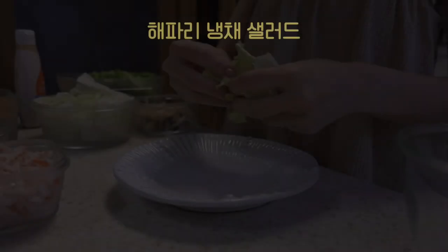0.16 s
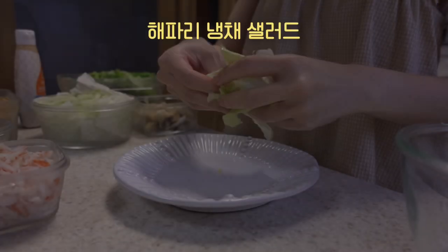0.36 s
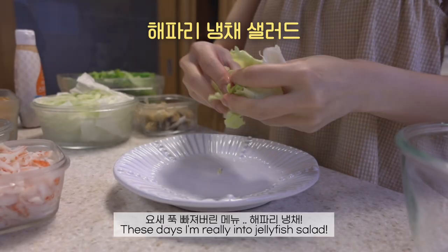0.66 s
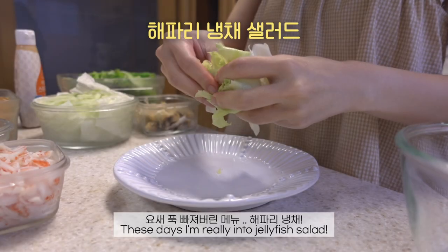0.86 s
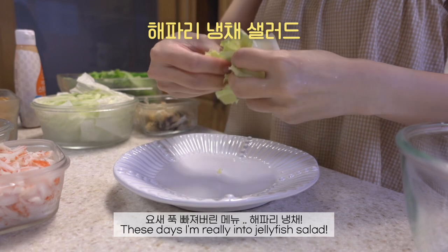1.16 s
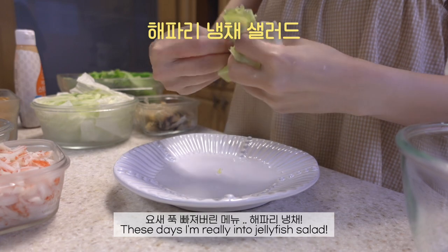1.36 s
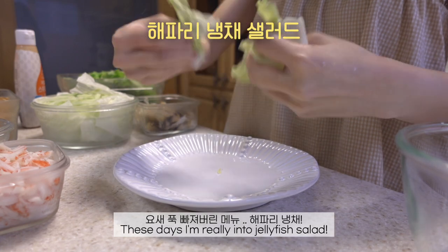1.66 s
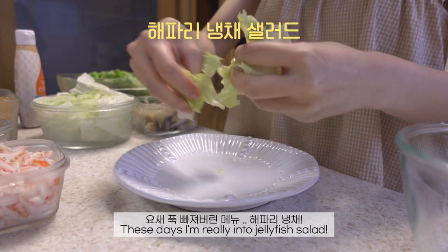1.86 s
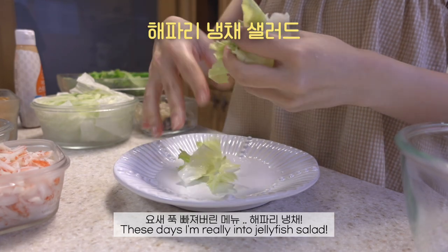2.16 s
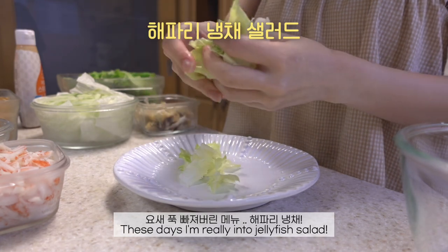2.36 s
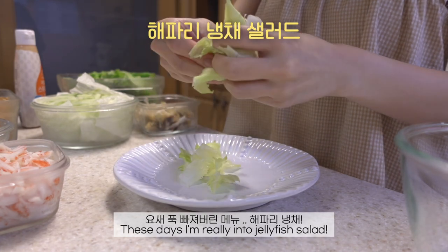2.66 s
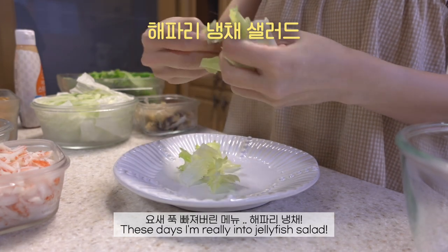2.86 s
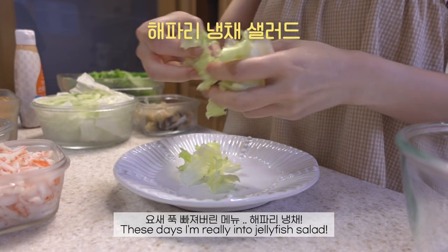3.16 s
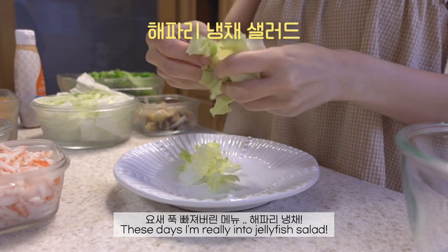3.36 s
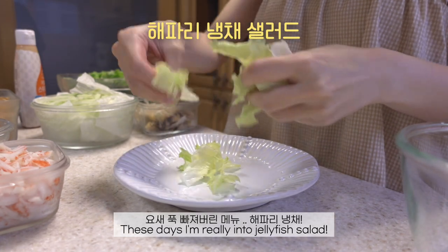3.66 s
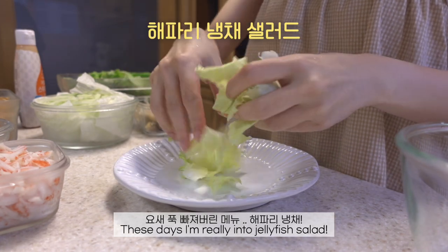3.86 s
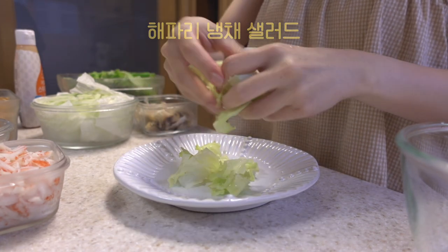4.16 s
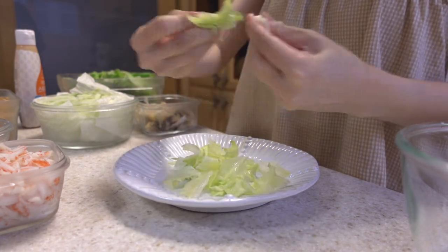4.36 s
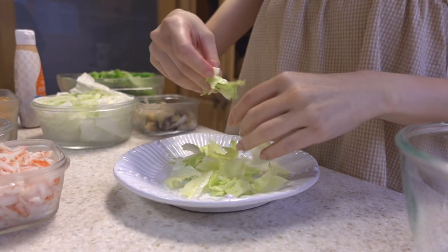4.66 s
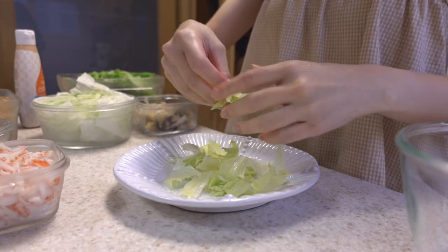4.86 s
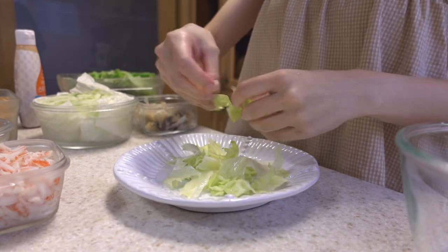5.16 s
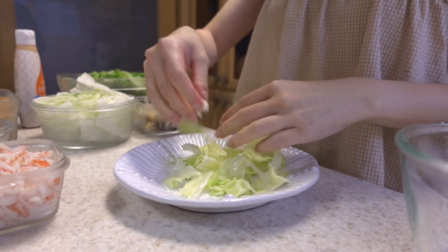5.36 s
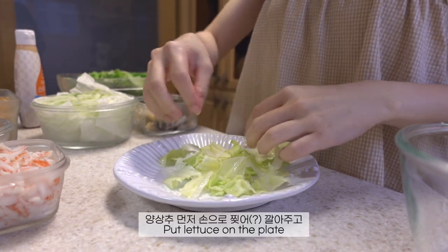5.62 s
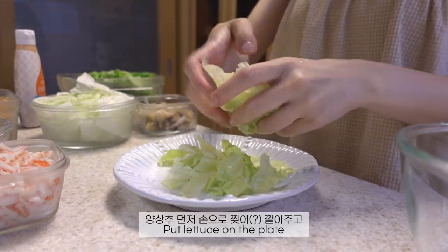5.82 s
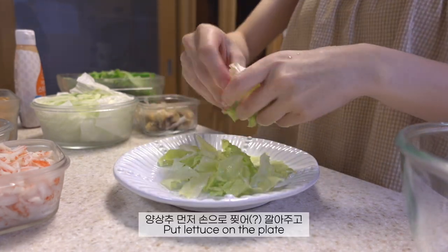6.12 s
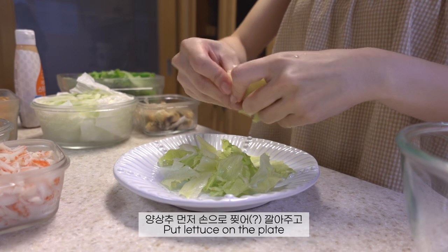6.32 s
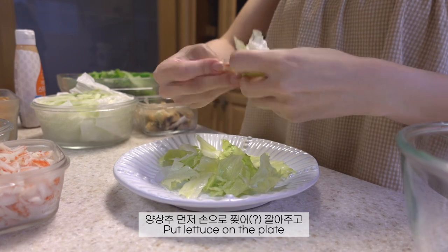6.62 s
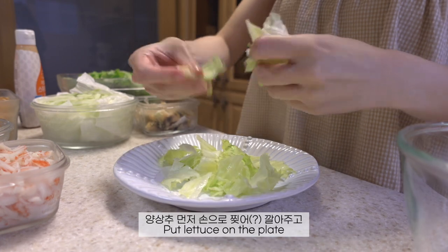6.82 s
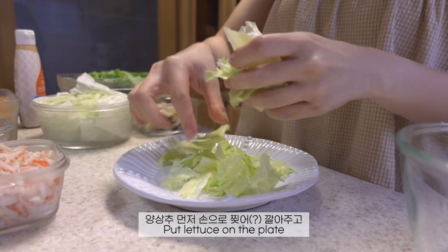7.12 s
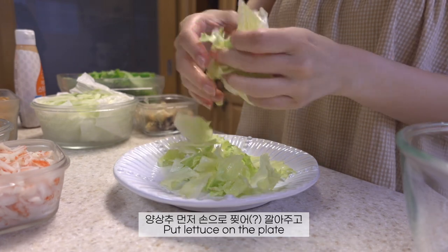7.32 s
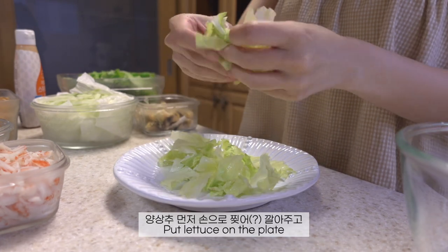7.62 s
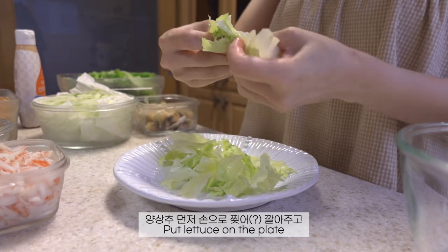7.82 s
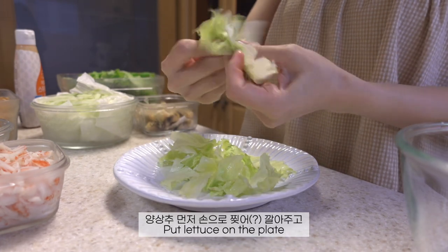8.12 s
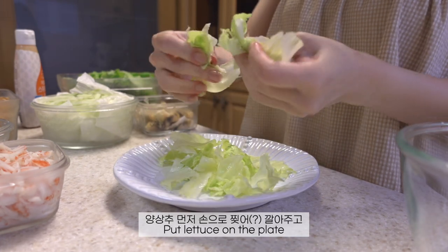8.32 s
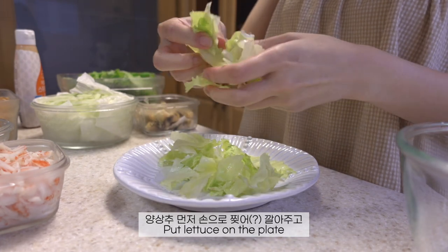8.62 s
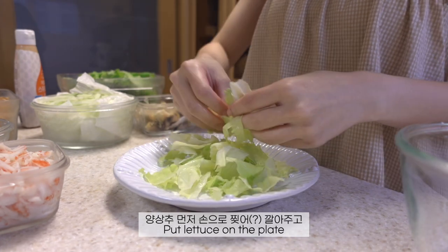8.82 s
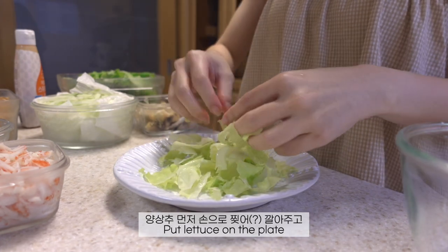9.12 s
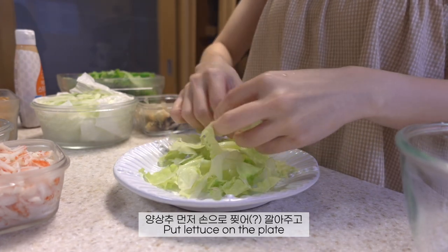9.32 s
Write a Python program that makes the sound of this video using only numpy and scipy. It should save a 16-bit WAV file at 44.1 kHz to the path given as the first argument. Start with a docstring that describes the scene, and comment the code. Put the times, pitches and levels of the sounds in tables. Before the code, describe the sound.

Close, dry crunches and crackles of lettuce being ripped apart, with quiet gaps, slight plate taps, and soft steady fridge hum behind.

```python
"""Crisp lettuce leaves are torn by hand over a ceramic plate, close by in a small kitchen.
Ribs snap as ragged noise bursts with a brief resonance; leaf cells crackle as clumps of tiny decaying sines.
Touches of the plate ring a few damped modes, and sparse reflections answer from the room.
Behind them a refrigerator hums as tones of wandering phase, over steady air of coloured noise."""
import sys
import numpy as np
from scipy import signal
from scipy.fft import rfft, irfft
from scipy.io import wavfile
from scipy.ndimage import uniform_filter1d

SR = 44100
rng = np.random.default_rng(int(sys.argv[2]) if len(sys.argv) > 2 else 0)


def put_to_file(sound):
    """Save the sound as 16-bit audio at rate SR, in the file named by the first command-line argument."""
    columns = np.atleast_2d(sound).T  # one column per channel
    safe = np.clip(columns, -1, 1)
    whole_steps = np.round(safe * 32767)
    wavfile.write(sys.argv[1], SR, whole_steps.astype(np.int16))


N = 418156  # length in samples


def gain_of(db):
    """Decibel law: every 20 dB is a factor of ten in amplitude."""
    return 10 ** (np.asarray(db) / 20)


def evened(x):
    """Normalisation: scales x to an RMS of one."""
    return x / np.sqrt(np.mean(x ** 2) + 1e-20)


def read(points, hz):
    """Logarithmic frequency scale: interpolates (Hz, value) points at hz."""
    point_hz, value = np.transpose(points)
    return np.interp(np.log(hz + 1), np.log(point_hz + 1), value)


def add(mix, start_s, sound):
    """Superposition: adds a sound to the mix, cut at the mix's end."""
    part = mix[round(start_s * SR):][:len(sound)]
    part += sound[:len(part)]


def colour(x, db):
    """Linear filtering: shapes the spectrum of x by db(hz)."""
    hz = np.fft.rfftfreq(len(x), 1 / SR)
    return irfft(rfft(x) * gain_of(db(hz)), len(x))


def thirds(x):
    """Band splitting: low body, middle and treble that sum to x again."""
    body_hz, treble_hz = 1600, 8000
    hz = np.fft.rfftfreq(len(x), 1 / SR)
    low = 1 / (1 + (hz / body_hz) ** 12)
    high = 1 / (1 + (treble_hz / (hz + 1)) ** 6)
    return [irfft(rfft(x) * part, len(x)) for part in (low, 1 - low - high, high)]


# Spectrum of the room's air. Each row: frequency in Hz, relative density in dB per Hz.
AIR_SPECTRUM = [(40, -40), (60, -15), (92, -18.5), (123, -1.5), (190, -5), (235, -4.5), (344, -6.5),
                (531, -12), (800, -15), (1400, -15), (2000, -13), (2690, -13), (3100, -18), (5140, -21.5),
                (10400, -36.5), (16000, -43)]
# Likeness of the two sides. Each row: frequency in Hz, left-right correlation from 0 to 1.
SIDE_LIKENESS = [(60, 1), (240, 0.78), (950, 0.69), (3770, 0.77), (15000, 0.59)]


def air(level_db=-54):
    """Diffuse field: steady noise, partly correlated between the sides, with faint drifting patches."""
    frames, hz = N // 512 + 5, np.fft.rfftfreq(2048, 1 / SR)
    a, b, c, d, patches = rng.standard_normal((frames, 1025, 5)).T
    # smoothed over 20 frequency bins and 8 frames
    patches = evened(uniform_filter1d(uniform_filter1d(patches, 20, 0), 8, 1))
    same = np.clip(read(SIDE_LIKENESS, hz), -1, 1)[:, None]
    left = a + 1j * b
    right = same * left + np.sqrt(1 - same ** 2) * (c + 1j * d)
    spectrum = np.array([left, right]) * gain_of(read(AIR_SPECTRUM, hz)[:, None] + 1.2 * patches)
    noise = signal.istft(spectrum, nperseg=2048, noverlap=1536)[1][:, :N]
    return gain_of(level_db) * evened(noise)


# Compressor tones. Each row: frequency in Hz, RMS level in dB before the left-right tilt, line width in Hz.
HUM_TONES = [(120, -57, 0.38), (57.3, -80, 2.4), (166.6, -66.5, 3.22), (215.3, -73, 7.4),
             (238, -69.5, 4.88), (276, -78.5, 4.1), (340.7, -69.5, 8.1), (378.7, -70.5, 4.74)]


def hum():
    """Phase diffusion: compressor tones whose phase wanders, which widens each spectral line."""
    t = np.arange(N) / SR
    walks = np.cumsum(rng.standard_normal((len(HUM_TONES), N)), axis=1)
    out = np.zeros(N)
    for (hz, db, width_hz), walk in zip(HUM_TONES, walks):
        wander = np.sqrt(2 * np.pi * width_hz / SR) * uniform_filter1d(walk, 2000)
        out += np.sqrt(2) * gain_of(db) * np.sin(2 * np.pi * hz * t + wander)
    return out


# Reverberation of the kitchen. Each row: frequency in Hz, time to die by 60 dB in seconds.
ROOM_DECAY = [(700, 0.31), (2600, 0.2), (7000, 0.2), (14000, 0.14)]


def kitchen(x, alike=0.96, turn_hz=11.):
    """Reverberation: sparse reflections of random sign, each band dying at its own speed.
    Three tails trade shares of x in a steady cycle, so successive snaps meet different reflections."""
    out = np.zeros((2, N))
    for place in range(3):
        taps = np.zeros((2, SR // 2))
        at = np.arange(100, SR // 2 - 20, 12)
        at = at + rng.integers(0, 12, (2, len(at)))
        np.put_along_axis(taps, at, rng.choice([-1., 1.], at.shape), 1)
        hz, t, z = signal.stft(taps, SR, nperseg=256)
        decay = gain_of(-60 * t / read(ROOM_DECAY, hz)[:, None])
        both, side = signal.istft(z * decay, SR, nperseg=256)[1]
        # the reverberation starts a little softer and builds up over some tens of milliseconds
        grows = 1 - 0.21 * np.exp(-np.arange(len(both)) / SR / 0.046)
        both, side = both * grows, side * grows ** 2
        tail = alike * both + np.sqrt(1 - alike ** 2) * np.outer([1, -1], side)
        # the squared shares of the three places add up to one
        share = np.sqrt(2 / 3) * np.cos(np.pi * (turn_hz * np.arange(N) / SR + place / 3))
        out += signal.fftconvolve((x * share)[None], tail / np.linalg.norm(both), axes=1)[:, :N]
    return out


# Touches of the plate. Each row: start in seconds, nominal level in dB, place from 0 to 2 along the rim.
PLATE_TOUCHES = [(1.966, -48, 0), (2.027, -45, 0.32), (4.694, -39, 0.39), (5.495, -43, 1.2),
                 (5.572, -40, 1.75)]
# Modes of the plate. Each row: frequency in Hz, level in dB at places 0, 1 and 2,
# time to die by 60 dB in seconds.
PLATE_MODES = [(1860, -25, -25, -5, 0.068), (2450, -2, -11, -16, 0.12), (2950, -40, -1, -0.5, 0.15),
               (3820, -11, -1, -12, 0.045), (4210, -22, -12, -6, .09), (5530, -19, -8, -20, 0.074),
               (8900, -40, -40, -22, .1)]


def plate():
    """Modal excitation: a fingernail or rib taps the rim with a scuff; the place sets how each mode rings."""
    out, t = np.zeros(N), np.arange(8000) / SR
    noises = rng.standard_normal((len(PLATE_TOUCHES), 8000))
    for (start_s, level_db, place), noise in zip(PLATE_TOUCHES, noises):
        ring = np.zeros(len(t))
        for hz, *place_db, t60 in PLATE_MODES:
            mode_db = np.interp(place, [0, 1, 2], place_db)
            ring += gain_of(mode_db - 60 * t / t60) * np.sin(2 * np.pi * hz * t)
        scuff = 0.17 * np.diff(noise, prepend=0) * np.exp(-t / 0.0022)
        onset = 1 - np.exp(-t / 0.00092)
        add(out, start_s, gain_of(level_db) * (ring + scuff) * onset)
    return out


# Spectrum of the leaf. Each row: frequency in Hz, relative density in dB per Hz.
LEAF_SPECTRUM = [(200, -17), (600, -26.5), (1000, -15), (1700, -10), (2200, -3), (3900, -3), (5300, -4),
                 (8000, -5), (11000, -11), (14000, -16), (16000, -21.5)]


def leaf_db(hz):
    """Radiation spectrum: how strongly the leaf sounds at each frequency."""
    return read(LEAF_SPECTRUM, hz)


# Hands working the leaves. Each row: time in seconds, nominal crackle level in dB,
# treble in dB relative to that level.
HAND_LEVELS = [(.03, -49, -11), (.13, -43, -12), (.4, -42.5, -14), (.54, -46, -6), (.63, -57, -16),
               (.66, -40.5, -12), (.75, -39.5, -12), (.84, -44.5, -12), (.95, -42, -9), (1.13, -46.5, -8),
               (1.4, -50, -6), (1.5, -54, -3.5), (1.9, -62, -8), (2.24, -59.5, -18), (2.28, -55.5, -17),
               (2.45, -46.5, -14), (2.75, -46.5, -0.5), (3.02, -63.5, -3), (3.08, -48, -6),
               (3.2, -56.5, -13), (3.5, -48, -1), (3.63, -58.5, -5), (3.7, -50.5, -4), (3.8, -59, -10),
               (4.15, -63.5, -18), (4.3, -48, -8), (4.45, -62, -4), (4.62, -64, -8), (4.67, -58, -9),
               (4.76, -67, -11), (5.03, -69, -9), (5.11, -61, 2), (5.19, -72, -6), (5.44, -69, -14),
               (5.49, -58, -11), (5.54, -68, -14), (5.76, -72, -18), (5.8, -50, -11), (5.94, -55, -16),
               (6.1, -44, -21), (6.27, -53, -16), (6.5, -39.5, -10), (6.62, -41.5, -6), (6.8, -51, -9),
               (7.05, -57.5, -24), (7.42, -58.5, -22), (7.455, -49, -14), (7.56, -54.5, -11),
               (7.7, -49, -4), (7.9, -51.5, 4), (8.11, -55, -1), (8.136, -30, -8), (8.17, -48, -4),
               (8.28, -51.5, -10), (8.45, -54.5, -5), (8.72, -58.5, -12), (9.15, -70, -22),
               (9.48, -68, -20)]


def handling(t):
    """Drive level: interpolates the hands' crackle and treble levels in dB at times t."""
    s, level_db, treble_db = np.transpose(HAND_LEVELS)
    return np.interp(t, s, level_db), np.interp(t, s, treble_db)


def trail(level_db=-30.5, dying_s=0.03):
    """Exponential relaxation: torn cells go on crackling after each clear snap, their powers adding up."""
    power = np.zeros(N)
    for s, peak_db, *_ in CLEAR_SNAPS:
        power[round(s * SR)] = gain_of(peak_db + level_db) ** 2
    return np.sqrt(signal.lfilter([1], [1, -np.exp(-2 / (dying_s * SR))], power))


def crackle(per_s=4000., spread_db=3., trail_treble_db=3.5):
    """Random impulse process: leaf cells burst in clumps, each ringing briefly at its own pitch."""
    t = np.arange(N) / SR
    drift = uniform_filter1d(uniform_filter1d(rng.standard_normal(N), 150), 150)
    clumps = gain_of(3.9 * evened(drift))
    strength = gain_of(spread_db * np.minimum(rng.exponential(1, N), 3.5))
    bursts = strength * (rng.random(N) < per_s / SR) * clumps
    kind, cells, u = rng.integers(0, 24, N), np.zeros(N), np.arange(200) / SR
    cycles = rng.uniform(0.18, 3.4, 24)  # decay time of each kind, in cycles
    for k, hz in enumerate(np.geomspace(1200, 15000, num=24)):
        cell = np.sin(2 * np.pi * hz * u) * np.exp(-u * hz / cycles[k])
        cell = cell * np.sqrt(hz) / np.linalg.norm(cell)
        cells += signal.oaconvolve(bursts * (kind == k), cell)[:N]
    low, middle, treble = thirds(colour(cells, leaf_db))
    level_db, treble_db = handling(t)
    level, after = gain_of(level_db), trail()
    bright = np.hypot(level * gain_of(treble_db), after * gain_of(trail_treble_db))
    return (low + middle) / np.std(middle) * np.hypot(level, after) + evened(treble) * bright


def snap(peak_db, ring_hz, low_db, treble_db, rise_ms, fall_ms, noise, ring_db=7.5, skirt_db=1.5):
    """Damped resonance: a quick run of fibres breaks raggedly and rings briefly in the leaf that holds it."""
    ms = np.arange(len(noise)) / SR * 1000 - LEAD_MS
    lasts = np.array([[1.5], [1.1], [.9]])  # the treble dies first
    scale_ms = np.where(ms < 0, rise_ms, fall_ms * lasts)
    t = abs(ms) / np.clip(scale_ms, [[.9], [.1], [.1]], 9)  # the low body cannot move quickly
    shape = np.exp(-t ** 0.75) + (ms > 0) * 0.17 * t * np.exp(-t / 1.38)

    def spectrum_db(hz):
        """Resonance curve: a peak at the ring; a small patch moves little below its pitch."""
        ring = ring_db / (1 + (3 * (hz / ring_hz - 1)) ** 2)
        octaves_below = np.clip(np.log2(ring_hz / (hz + 1)), 0, 1.5)
        return leaf_db(hz) + ring - skirt_db * octaves_below

    parts = thirds(colour(noise, spectrum_db)) * shape
    burst = gain_of([low_db, 0, treble_db]) / np.linalg.norm(parts, axis=1) @ parts
    strongest = uniform_filter1d(burst ** 2, 44).max()  # mean square over 1 ms
    return gain_of(peak_db) * burst / np.sqrt(2 * strongest)


def small_snaps(count=1200, per_s=70., over_crackle_db=5.5, spread_db=4):
    """Poisson process: rows of chance snaps, their strength and brightness following the handling."""
    wait, size, pitch, low, tone, rise, fall = rng.random((count, 7)).T
    at = .04 - np.cumsum(np.log(1 - wait)) / per_s
    level_db, treble_db = handling(at)
    peak_db = level_db + over_crackle_db - spread_db * np.maximum(np.log(1 - size), -2.5)
    ring_hz, low_db = 2400 * 3.3 ** pitch, -28 + 11 * low
    treble_db = treble_db - 11 + 11 * tone
    rise_ms, fall_ms = 0.18 + 1.3 * rise ** 2, 0.22 + 2.0 * fall
    rows = np.transpose([at, peak_db, ring_hz, low_db, treble_db, rise_ms, fall_ms])
    return rows[at < N / SR - .03]


LEAD_MS = 9.  # room before each snap's peak for its build-up
# The clearest snaps of ribs and tears. Each row: time of the peak in seconds, nominal peak level in dB,
# ring in Hz, low body and treble in dB relative to the middle band,
# nominal build-up and dying times in milliseconds.
CLEAR_SNAPS = [(0.0718, -44, 4090, -29, -20, 0.2, 0.3), (0.0781, -29, 5490, -25, -19, 0.3, 0.91),
               (0.11, -29.5, 2580, -18, -10, 0.6, 3.8), (0.1244, -30, 2630, -34, -9, 0.2, 0.3),
               (0.1675, -23, 6400, -26, 6, 0.2, 0.27), (0.1824, -22.5, 3290, -23, -7, 0.2, 1.9),
               (0.2079, -24.5, 2690, -26, -13, 0.7, 0.9), (0.226, -14.5, 2900, -28, -8, 0.36, 0.55),
               (0.2358, -22, 5470, -29, -14, 0.3, 0.93), (0.2578, -33, 3230, -13, -14, 0.3, 1.2),
               (0.3138, -30, 2670, -17, -13, 0.3, 1.4), (0.3221, -25, 4160, -16, -4, 0.3, 0.7),
               (0.3734, -19, 5100, -16, -7, 0.3, 1.0), (0.383, -22.5, 4220, -16, -16, 0.2, 2.1),
               (0.3959, -24.5, 3010, -14, -11, 1, 5.6), (0.4234, -21.5, 3360, -16, -4, 0.34, 2.0),
               (0.4893, -13.5, 4230, -20, -9, 0.22, 1.1), (0.5232, -22.5, 3450, -15, -10, 4.1, 2.7),
               (0.5439, -25.5, 3420, -14, -13, 4.1, 0.6), (0.6471, -25.5, 3230, -18, -19, 0.3, 0.97),
               (0.6677, -27, 2990, -10, -15, 2.2, 0.5), (0.6752, -22, 4030, -20, -14, 3.4, 1.2),
               (0.6886, -24, 3140, -17, -10, 0.3, 1.2), (0.7039, -13, 3460, -29, -16, 0.76, 1),
               (0.7226, -26, 2650, -16, -11, 4.1, 1.9), (0.7386, -12, 3870, -33, -25, 0.22, 0.33),
               (0.7916, -18, 3380, -19, -10, 0.2, 0.3), (0.7985, -13, 9190, -31, -5, 0.3, 1.1),
               (0.863, -26.5, 4220, -18, -19, 0.75, 1.5), (0.902, -19, 2580, -20, -9, 0.3, 1.5),
               (0.91, -23, 3120, -21, -11, 1.3, 0.7), (0.9396, -10.5, 3820, -28, -11, 0.35, 0.27),
               (0.9458, -13, 5070, -17, -7, 2.1, 1), (0.952, -22, 3400, -12, -7, 0.3, 2.2),
               (0.974, -12.5, 4050, -19, -16, 1.2, 0.97), (0.9932, -13, 4160, -27, -5, 0.96, 1.2),
               (1.0135, -13.5, 6780, -35, 5, 0.3, 0.3), (1.021, -10.5, 4000, -24, -14, 0.8, 0.62),
               (1.069, -22, 3170, -29, -9, 0.3, 0.8), (1.117, -11.5, 3400, -25, -17, 0.98, 0.59),
               (1.1315, -21, 2730, -22, -17, 0.6, 3.4), (1.1507, -17, 2000, -22, -11, 0.7, 1.7),
               (1.1963, -24, 6140, -25, -1, 0.2, 0.3), (1.212, -17.5, 3520, -34, -11, 0.44, 0.4),
               (1.2515, -30, 11280, -34, 2, 0.2, 0.6), (1.2665, -10.5, 3450, -23, -7.5, 0.4, 1.8),
               (1.3177, -20.5, 2630, -17, -10, 1.0, 1.0), (1.3343, -20.5, 3230, -19, -7, 0.3, 3.8),
               (1.3594, -16.5, 8120, -32, -8, 0.2, 0.35), (1.3662, -22, 5750, -23, -6, 0.2, 0.3),
               (1.4132, -28, 4440, -36, -1, 0.3, 0.98), (1.4383, -21.5, 7860, -26, -2, 0.22, 0.3),
               (1.5158, -32, 8140, -27, -2, 0.2, 0.3), (1.5217, -29, 8010, -38, -2, 0.3, 0.6),
               (1.528, -23, 7860, -29, 6, 0.2, 0.48), (1.5374, -7.5, 4650, -18.5, -7.5, 0.68, 1.54),
               (1.5455, -19.5, 4350, -22, -5, 4.1, 4.2), (1.5893, -26, 4540, -26, -1, 0.3, 1.24),
               (1.6051, -22.5, 4480, -24, -3, 0.2, 0.3), (1.9565, -40, 6200, -22, -11, 0.2, 2.2),
               (1.9672, -36.5, 2410, -30, -7, 1.6, 1.3), (2.0284, -34.5, 2370, -12, -16, 0.6, 1.5),
               (2.2667, -25.5, 4400, -31, -8, 0.5, 1.1), (2.287, -26.5, 2520, -20, -9, 0.3, 2.4),
               (2.36, -25.5, 3850, -18, -8, 0.3, 0.58), (2.4019, -25, 3700, -35, 1, 0.2, 1.1),
               (2.4849, -31.5, 3810, -19, -9, 2.2, 3.6), (2.5125, -26, 5020, -28, -12, 0.2, 0.28),
               (2.534, -25, 5120, -26, -11, 0.2, 0.91), (2.5479, -24.5, 3190, -23, -21, 0.2, 0.9),
               (2.5993, -12.5, 5860, -25, -6, 0.32, 0.78), (2.6291, -19, 3850, -31, -6, 0.3, 0.74),
               (2.6415, -19, 6680, -34, 0, 4.1, 1.0), (2.6537, -10, 4900, -35, -11, 0.45, 0.71),
               (2.6885, -14, 7110, -41, 2, 0.22, 0.46), (2.7008, -24, 2630, -30, -12, 4.1, 1.6),
               (2.723, -27, 6650, -23, -5, 0.3, 0.3), (2.7562, -20, 5580, -24, -6, 0.3, 2.2),
               (2.7724, -22.5, 8700, -27, -4, 0.3, 1.4), (2.779, -21.5, 8870, -27, -3, 0.91, 0.3),
               (2.7915, -20, 4890, -26, -7, 0.3, 1.7), (2.7982, -21, 7690, -36, -3, 0.2, 0.33),
               (2.8133, -11, 8540, -23, -10.5, 1.2, 3.1), (2.8871, -22.5, 6120, -18, -10, 0.2, 0.4),
               (2.895, -23.5, 7430, -18, -6, 0.7, 0.84), (2.9767, -38, 4760, -24, -8, 0.2, 0.3),
               (3.065, -33, 2410, -25, -11, 0.2, 0.4), (3.079, -33, 2730, -22, -10, 5.1, 3.3),
               (3.0883, -30.5, 2600, -25, -10, 1.6, 1.6), (3.0961, -29, 7080, -33, -4, 0.3, 0.3),
               (3.2695, -22, 6610, -24, -12, 0.24, 0.38), (3.3246, -28, 5190, -22, -3, 0.3, 0.52),
               (3.3297, -17.5, 6300, -32, -2, 0.37, 0.85), (3.3631, -19.5, 3270, -23, -6, 0.4, 2.6),
               (3.4012, -33, 6180, -27, -9, 0.3, 0.8), (3.428, -31, 6030, -30, 2, 0.3, 0.6),
               (3.4962, -17, 6140, -25, -2, 0.23, 0.64), (3.5046, -19, 6980, -26, -2, 3.2, 2),
               (3.5109, -21, 7470, -36, -7, 0.3, 0.79), (3.5243, -19.5, 7860, -16, -2, 0.3, 0.71),
               (3.6646, -28, 6700, -30, -6, 0.33, 0.38), (3.6835, -28.5, 2090, -22, -14, 1.1, 0.35),
               (3.7059, -28.5, 5210, -20, -12, 1.4, 0.3), (3.8488, -39, 2380, -24, -24, 0.2, 0.9),
               (4.1812, -35, 2520, -27, -18, 1, 2), (4.2462, -20, 4770, -39, -8, 0.2, 1.0),
               (4.322, -22, 8600, -18.5, -4.5, 0.7, 1.2), (4.3337, -26, 5300, -21, -6, 0.7, 1.5),
               (4.347, -22, 10000, -16, 3, 2.2, 2.6), (4.5093, -37, 4720, -29, -14, 0.3, 2.2),
               (4.5293, -42, 5530, -23, -10, 1.8, 2.9), (4.682, -39.5, 1920, -23, -16, 0.2, 1.3),
               (4.6883, -38, 3250, -12, -20, 0.2, 1.9), (5.0931, -42, 5580, -23, -10, 0.6, 2.5),
               (5.788, -33, 2760, -29, -18, 2.3, 2.1), (5.813, -29, 3140, -16, -18, 2.1, 1.2),
               (5.8185, -26, 3320, -16, -22, 0.2, 1.4), (5.8317, -32, 5190, -15, -14, 1.2, 2),
               (5.8438, -26.5, 3170, -24, -6, 0.48, 0.5), (5.865, -34.5, 2760, -16, -15, 3.9, 0.4),
               (5.9025, -35, 3290, -18, -23, 1.2, 0.6), (5.9836, -19.5, 4700, -22, -17, 0.47, 1.4),
               (6.0032, -17, 3850, -17.5, -14, 2.1, 0.6), (6.0886, -23.5, 2760, -20, -12, 1.2, 0.9),
               (6.101, -17, 2700, -17, -14, 0.2, 1.5), (6.1135, -30.5, 3170, -11, -11, 0.6, 1.8),
               (6.1989, -23, 3170, -19, -23, 0.2, 2.0), (6.24, -25, 7020, -34, -5, 0.2, 1.1),
               (6.246, -21.5, 2710, -28, -16, 0.2, 1.7), (6.259, -23, 2760, -22, -14, 0.3, 1.1),
               (6.294, -14.5, 3230, -27, -19, 0.4, 1.1), (6.3264, -22, 2780, -30, -17, 0.2, 1.0),
               (6.3367, -26, 2730, -25, -23, 0.23, 0.9), (6.3595, -10.5, 3940, -25, -4, 0.16, 0.77),
               (6.384, -18, 3230, -20, -14, 0.2, 0.4), (6.3945, -9, 3080, -17, -14, 0.34, 1.4),
               (6.401, -12.5, 3960, -17, -14, 0.9, 1.9), (6.4219, -16, 4840, -24, -9, 0.3, 1.2),
               (6.4355, -16, 3850, -18, -6, 0.3, 2.3), (6.4441, -13, 9690, -25, -4, 0.8, 1.4),
               (6.4628, -16, 7600, -15, -7, 1.9, 0.5), (6.475, -11, 2220, -28, -15, 0.2, 0.79),
               (6.491, -8.5, 4700, -27, -13, 0.2, 0.6), (6.519, -17, 3190, -16, -9, 0.4, 3.6),
               (6.5268, -10, 3850, -17.5, -7, 2.8, 1.6), (6.5387, -15.5, 6030, -18, -12, 0.6, 2.8),
               (6.5444, -19, 2860, -14, -13, 0.2, 1.5), (6.5633, -10, 2950, -31, -21, 0.25, 0.92),
               (6.6017, -21, 3920, -22, -10, 1.6, 1.8), (6.6171, -19, 4650, -27, -13, 1.8, 1.0),
               (6.6408, -10.5, 3630, -16, -11, 1.3, 0.55), (6.674, -10, 3370, -17, -7.5, 0.7, 2.1),
               (6.688, -22, 3570, -18, -11, 4.1, 3.1), (6.71, -19.5, 3940, -22, -11, 0.2, 0.74),
               (6.814, -31, 2780, -14, -19, 0.9, 0.3), (6.8597, -32.5, 2800, -21, -15, 0.6, 0.7),
               (6.882, -34, 4160, -20, -11, 0.3, 0.81), (6.901, -34, 4220, -17, -16, 0.3, 0.4),
               (6.912, -28.5, 2730, -30, -26, 0.34, 0.78), (6.9259, -37, 2450, -30, -18, 0.2, 1.2),
               (6.9614, -34.5, 3140, -29, -14, 0.2, 0.8), (7.0085, -33, 3080, -24, -25, 0.44, 0.8),
               (7.0444, -30.5, 3250, -34, -18, 0.3, 0.96), (7.0543, -29, 4180, -25, -20, 0.3, 1.2),
               (7.069, -35, 4610, -24, -18, 0.3, 1.8), (7.0743, -33, 4240, -26, -15, 0.88, 0.3),
               (7.0897, -35, 4940, -31, -20, 0.3, 2.7), (7.191, -41, 3270, -16, -21, 0.3, 1.0),
               (7.2485, -40, 4260, -26, -21, 0.2, 0.8), (7.3146, -39, 3380, -26, -12, 0.2, 0.5),
               (7.357, -40.5, 3880, -18, -18, 3.5, 1.4), (7.4632, -24.5, 3300, -33, -21, 0.46, 0.62),
               (7.5005, -28.5, 3850, -30, -13, 3.4, 0.4), (7.5133, -23, 3940, -35, -9, 0.24, 0.3),
               (7.5939, -19.5, 3150, -27, -17, 0.2, 0.9), (7.655, -25, 4780, -23, -10, 0.2, 1.3),
               (7.7088, -19.5, 6480, -25, -11, 0.18, 0.34), (7.7232, -20.5, 6240, -31, -8, 0.26, 0.9),
               (7.7401, -13, 6440, -38, -3, 0.2, 1.6), (7.802, -30, 6680, -34, -3, 0.2, 1.5),
               (7.828, -27.5, 9500, -27, 0, 1.6, 0.8), (7.8442, -25, 7470, -27, -7, 0.3, 1.0),
               (7.8501, -15.5, 3400, -31, -16, 0.23, 0.48), (7.8575, -24, 5600, -22, -10, 0.2, 0.5),
               (7.8644, -21, 5580, -22, -5, 0.3, 1.0), (7.8725, -24.5, 4290, -20, -4, 2.2, 1.4),
               (7.9063, -19, 2730, -17, -2, 0.17, 0.62), (7.913, -14, 5500, -17, -18, 0.27, 1.2),
               (7.9201, -27, 4310, -19, -15, 0.4, 0.75), (7.9678, -26, 7580, -21, -11, 0.3, 0.9),
               (7.9928, -25.5, 4330, -36, 0, 0.2, 0.8), (8.0131, -21, 5030, -31, -12, 0.14, 0.25),
               (8.1184, -23, 5120, -35, -2, 0.33, 0.3), (8.13, -6.5, 7400, -16.5, -7, 0.22, 0.57),
               (8.143, -7.5, 4840, -26, -6, 0.8, 1.0), (8.149, -15, 6800, -26, -3, 1.6, 2.7),
               (8.1835, -20, 7640, -23, -7, 0.5, 2.4), (8.1899, -10, 6680, -21.5, -8, 0.33, 0.46),
               (8.1978, -12, 2560, -38, -10, 1.1, 0.59), (8.205, -24, 5640, -33, -8, 0.6, 3.2),
               (8.3222, -35.5, 5710, -31, 0, 0.22, 0.7), (8.411, -35, 5230, -20, -10, 0.8, 0.6),
               (8.4224, -29.5, 2760, -31, -14, 0.3, 2.7), (8.452, -23, 5100, -28, -10, 1.6, 1.5),
               (8.4974, -26.5, 5170, -28, -15, 0.6, 0.9), (8.648, -38.5, 9190, -25, -2, 0.2, 3.6),
               (8.6897, -35.5, 2300, -18, -4, 0.2, 0.62)]


def snaps():
    """Brittle fracture: every snap has its own fibres, and some break harder than others."""
    out = np.zeros(N)
    for rows in (CLEAR_SNAPS, small_snaps()):
        fibres = rng.standard_normal((len(rows), 1024))
        hardness = gain_of(rng.standard_normal((len(rows), 128))).repeat(8, 1)
        for (s, *columns), noise in zip(rows, fibres * hardness):
            add(out, s - LEAD_MS / 1000, snap(*columns, noise))
    return out


def scene():
    """Superposition: direct leaf and plate sound, their reflections, and the background."""
    # thin leaves move no bass
    near = colour(snaps() + crackle(), lambda hz: read([(120, -33), (400, -2)], hz))
    # one microphone port hears the hands first: a fraction of a sample, made by the slope
    lead = np.outer([1, -1], 0.17 * np.gradient(near) - .02 * near)
    pings = plate()
    wet = gain_of(-7) * kitchen(near + .4 * pings)
    background = (air() + hum()) * gain_of([[.4], [-.4]])  # left-right tilt in dB
    return near + lead + pings + wet + background


def record(dry):
    """Band limiting: the microphone opens after a short silence, then a low-pass removes the top."""
    start_s, edge_hz = .0245, 16100
    opened = dry * (np.arange(N) > start_s * SR)
    low_pass = signal.firwin(511, edge_hz, window=("kaiser", 9), fs=SR)
    return signal.oaconvolve(opened, low_pass[None], "same")


dry = scene()
out = record(dry)
put_to_file(out)
```